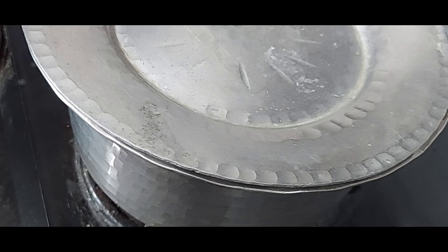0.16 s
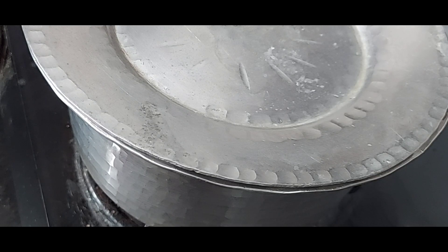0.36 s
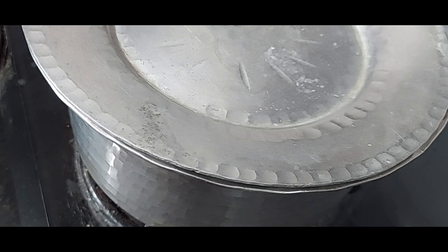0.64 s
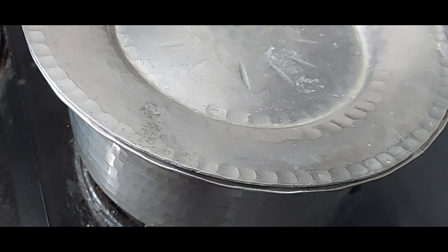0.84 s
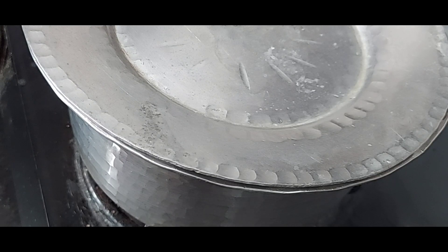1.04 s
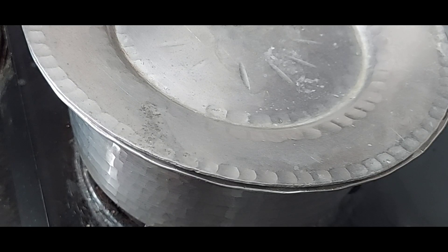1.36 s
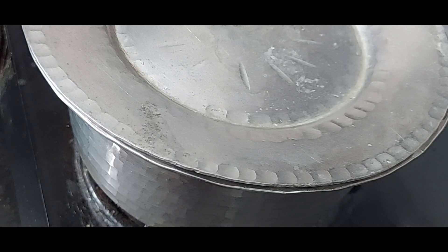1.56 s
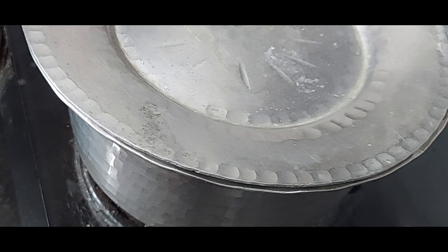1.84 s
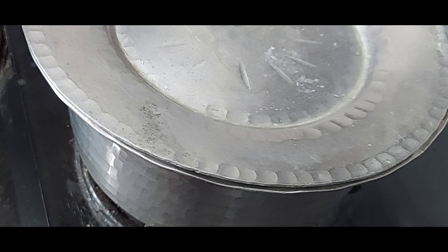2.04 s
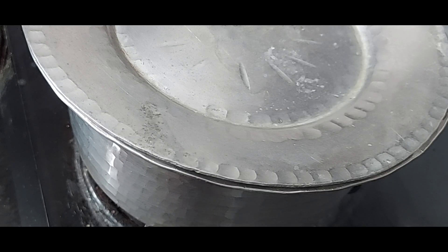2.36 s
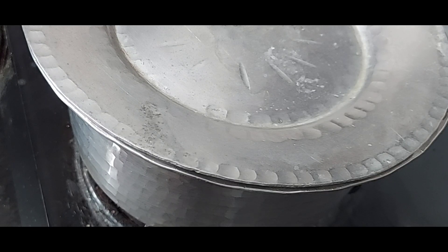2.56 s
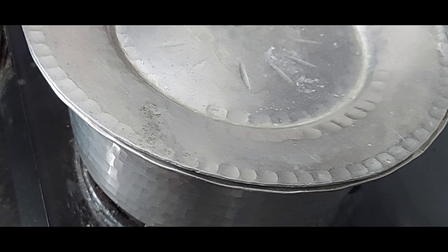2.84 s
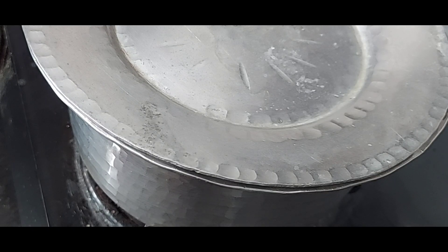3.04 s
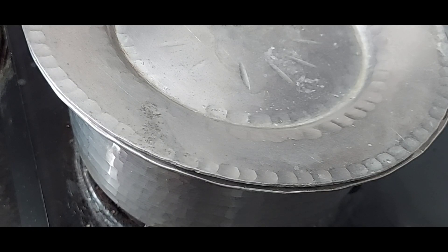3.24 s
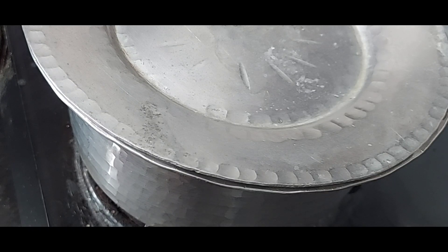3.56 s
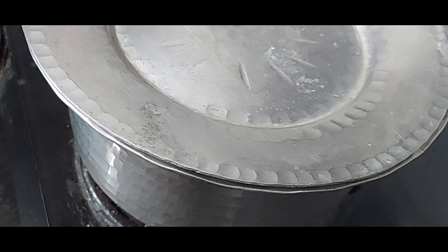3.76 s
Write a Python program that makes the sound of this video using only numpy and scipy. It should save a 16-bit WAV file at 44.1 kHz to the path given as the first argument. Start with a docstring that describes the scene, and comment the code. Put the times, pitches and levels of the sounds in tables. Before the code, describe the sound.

Popcorn pops in a covered steel pot, close and nearly mono. Hollow, low thumps with crisp cracks and small steam puffs come singly at about 0.2, 0.5, 0.8, 1.0, 1.5 and 1.95 seconds, then cluster around 2.2-2.5, 2.9-3.0 and 3.3-3.8. Kernels ping the lid, strongest near 2.5; dull wall knocks start near 1.25. Faint uneven sizzle and low stove rush continue in a small kitchen's short echo.

```python
"""Popcorn pops in a covered steel pot on a kitchen stove, close to a nearly mono microphone.
Each pop is a noise crack, a thump of ringing air under the lid, pot modes, a boom and a steam puff.
Flying kernels ring the lid as damped sines with a noise clack, or knock dully on the pot wall.
Shaped noise sizzles throughout over the stove's low rush; a decaying noise echo is the small kitchen."""
import sys
import numpy as np
from scipy import signal
from scipy.fft import rfft, irfft, next_fast_len
from scipy.io import wavfile
from scipy.ndimage import map_coordinates

SR = 44100
rng = np.random.default_rng(int(sys.argv[2]) if len(sys.argv) > 2 else 0)


def generate_wav(sig):
    """Save sig (samples, or channels by samples) to the path in sys.argv[1] as 16-bit PCM at SR."""
    pcm = np.round(np.clip(np.atleast_2d(sig).T, -1, 1) * 32767).astype(np.int16)
    wavfile.write(sys.argv[1], SR, pcm)


N = 171990
AGE = np.arange(int(0.8 * SR)) / SR  # time since an event's onset, s


def amp(db):
    """Decibels to gain."""
    return 10 ** (np.asarray(db) / 20)


def unit(x):
    """Scale to rms 1."""
    return x / np.sqrt(np.mean(x ** 2) + 1e-20)


def along(points, hz):
    """Interpolate (f/Hz, value) points on a log frequency axis."""
    f, value = np.transpose(points)
    return np.interp(np.log(hz + 1), np.log(f + 1), value)


def fade(t60_s):
    """Exponential decay, -60 dB at t60_s."""
    return amp(-60 * AGE / max(t60_s, 1e-4))


def rise(time_constant_s):
    """Soft exponential onset."""
    return 1 - np.exp(-AGE / max(time_constant_s, 1e-5))


def noise(colour_db, size=len(AGE)):
    """Noise of rms 1; colour_db maps f/Hz to relative level/dB."""
    spectrum = rfft(rng.standard_normal(size))
    gain = amp(colour_db(np.fft.rfftfreq(size, 1 / SR)))
    return unit(irfft(spectrum * gain, size))


def wobble(knots_per_s):
    """Smooth random curve: spline through normal random knots."""
    knots = rng.standard_normal(N // 8)
    return map_coordinates(knots, [np.arange(N) * knots_per_s / SR], mode="wrap")


def ring(modes, scatter_db):
    """Sum of damped modes, each with a random phase and level scatter."""
    total = 0
    for hz, db, t60_s in modes:
        level = amp(db + scatter_db * rng.standard_normal())
        total = total + level * fade(t60_s) * np.sin(2 * np.pi * (hz * AGE + rng.random()))
    return total


def add(track, s, sound):
    """Mix a sound in at time s."""
    part = track[max(round(s * SR), 0):][:len(sound)]
    part += sound[:len(part)]


# Bursting kernels: t/s, thump level/dB, crack level/dB, crack tilt/(dB/octave), steam level/dB
POP_EVENTS = [(0.2273, -1, -5.5, -7, -28.5), (0.5268, -1, -24, -12, -21), (0.8439, -4.5, -9, 3.5, -28.5),
              (1.0368, -1.5, -7, 3.5, -27.5), (1.4501, -5.5, -22.5, -2, -23), (1.9565, -0.5, -11.5, 6, -19),
              (2.1876, 1.5, -11, 9.5, -26), (2.335, -4, -18, 6, -24.5), (2.3429, 0.5, -13.5, 14, -20.5),
              (2.5108, -4, -16, 5, -24.5), (2.902, -13.5, -11, 5, -25), (2.948, -2, -12.5, -7.5, -23),
              (3.0065, 0.5, -12.5, 8, -25), (3.3176, -2.5, -14.5, -3.5, -24), (3.3683, -10, -37, -2, -33),
              (3.4280, -1, -13.5, -11, -24.5), (3.4608, -3, -3.5, 7, -34), (3.4938, -5.5, -14, 2, -30),
              (3.7205, -3.5, -15.5, 8, -30), (3.766, -5.5, -15, 3, -30)]


def pops():
    """A bursting hull cracks, thumps the air, rings the pot, booms in the room and vents steam."""
    boom_db, pot_db = -30, -33
    out = np.zeros(N)
    push = thump()
    for s, thump_db, crack_db, tilt_db_per_octave, steam_db in POP_EVENTS:
        body = push + amp(boom_db) * boom() + amp(pot_db) * pot_ring()
        pop = amp(thump_db) * body
        pop = pop + amp(crack_db) * crack(tilt_db_per_octave)
        pop = pop + amp(steam_db) * steam_puff()
        add(out, s, pop)
    return out


# Air resonances under the lid and around the pot: f/Hz, level/dB, t60/s
AIR_MODES = [(80.7, -40, 0.55), (102.65, -29.5, .7), (145, -17.5, 0.054), (201, -27.5, 0.22),
             (214.6, -24, 0.44), (284.6, -32, 0.48), (323.3, -1.4, 0.037), (330, -18, 0.094),
             (375.3, -36, 0.57), (486.4, -36.5, 0.15), (489, -2.5, 0.016)]
# Thump echoes off nearby walls: delay/s, level/dB
WALL_ECHOES = [(.01164, -10), (.02213, -8.7), (.02514, -11), (.03552, -10.7), (.06503, -15)]


def thump():
    """The swelling kernel gives one push, the enclosed air rings on, nearby walls echo both."""
    push_hz, push_db, push_lag_s = 252.4, -4.5, 0.0029
    push_rise_s, air_rise_s = 0.00034, 0.0058
    t = AGE - push_lag_s
    after = np.maximum(t, 0)
    u = (np.pi * push_hz * t) ** 2
    push = amp(push_db) * (1 - 2 * u) * np.exp(-u) * rise(push_rise_s)  # Ricker pulse
    air = sum(amp(db - 60 * after / t60_s) * np.cos(2 * np.pi * hz * t) for hz, db, t60_s in AIR_MODES)
    direct = push + air * (1 - np.exp(-after / air_rise_s))
    echoes = sum(amp(db) * np.interp(AGE - s, AGE, direct, left=0) for s, db in WALL_ECHOES)
    return direct + echoes


# Hull crack spectrum before tilt: f/Hz, relative level/dB
CRACK_COLOUR = [(300, 3.5), (1000, -52), (2150, -7.5), (2600, 14), (3100, 2.5), (3700, 7.5), (7000, 7.5),
                (9700, 8), (12500, -3.5), (15500, -15)]


def crack(tilt_db_per_octave):
    """The hull tears: a short noise burst, tilted above 1 kHz, with a weaker scattered tail."""
    rise_s, t60_s, scatter_db, scatter_t60_s = 0.0008, 0.011, -15.5, 0.11

    def colour_db(hz):
        octaves = np.log2(np.maximum(hz, 1000) / 1000)
        return along(CRACK_COLOUR, hz) + tilt_db_per_octave * octaves

    decay = fade(t60_s) + amp(scatter_db) * fade(scatter_t60_s)
    return noise(colour_db) * rise(rise_s) * decay


# Pot body modes: f/Hz, relative level/dB, t60/s
POT_MODES = [(826, -6, 0.5), (853, -5.5, 0.39), (1558, -3.5, 0.25), (1590, -4.5, 0.33), (1672, 1, 0.076),
             (2516, -0.5, 0.19), (2539, 6, 0.039), (3575, -9.5, 0.3)]


def pot_ring():
    """The steel body, shaken by a pop, rings in its damped modes."""
    return ring(POT_MODES, scatter_db=3.0) * rise(0.00029)


# Room boom spectrum: f/Hz, relative level/dB
BOOM_COLOUR = [(30, -40), (80, 6.5), (320, -2.5), (700, -24.5), (1300, -92)]


def boom():
    """The room answers a pop with slowly rising, decaying low noise."""
    rise_s, t60_s = 0.022, 0.5
    return noise(lambda hz: along(BOOM_COLOUR, hz)) * rise(rise_s) * fade(t60_s)


# Steam puff spectrum: f/Hz, relative level/dB
STEAM_COLOUR = [(600, 13), (2000, 4), (3500, 5), (7200, -2), (9300, 11), (11500, -8), (14000, -5.5),
                (16000, -68)]


def steam_puff():
    """Steam leaves the burst kernel as a soft-edged puff of noise."""
    rise_s, t60_s = 0.0099, 0.31
    return noise(lambda hz: along(STEAM_COLOUR, hz)) * rise(rise_s) * fade(t60_s)


# Lid strikes: t/s, level/dB, brightest f/Hz, width/octaves, favoured mode 1 f/Hz, mode 2 f/Hz, their t60/s
LID_STRIKES = [(0.3937, -26, 5100, 0.81, 6270, 3897, 0.23), (0.5606, -18.5, 4200, 0.48, 4855, 4313, 0.18),
               (0.571, -22.5, 5000, 0.54, 5585, 3984, 0.37), (0.6624, -26, 8700, 1.06, 9300, 7400, .1),
               (1.4927, -20, 5230, 0.94, 3897, 6400, 0.17), (1.969, -21.5, 7340, 0.79, 7430, 3350, 0.2),
               (1.991, -18.5, 4100, 0.46, 4855, 4040, .34), (2.5185, -10.5, 3700, 1.1, 2510, 5300, 0.12),
               (2.537, -15.5, 3700, .55, 3223, 4370, 0.22), (2.5782, -20.5, 8360, 0.23, 9300, 9450, 0.12),
               (3.040, -28.5, 4970, 0.89, 3350, 5300, 0.26), (3.053, -24.5, 3770, 0.65, 3718, 4320, .16),
               (3.0973, -23.5, 4400, 1.08, 5350, 6300, .18), (3.336, -25.5, 8300, 0.46, 7430, 9600, 0.11),
               (3.37, -30, 1940, 0.13, 1590, 2475, 0.052), (3.8012, -30.5, 5440, 0.55, 3718, 5060, 0.29),
               (3.8422, -24.5, 4560, 0.42, 4855, 5585, 0.29)]
# Main lid modes: f/Hz
LID_MODE_HZ = [1590, 2475, 2515, 2942, 3223, 3350, 3677, 3718, 3897, 3984, 4313, 4855, 5240, 5350, 5585,
               6270]
# Main lid modes, same order: relative level/dB
LID_MODE_DB = [8, 9, 12, 6.5, 0, 8.5, 8, 1, -2, 1, -3, 3.5, 4, -4, -0.5, 5.5]


def lid_modes():
    """Main modes plus 100 crowded upper modes at random frequencies: f/Hz, level/dB, t60/s."""
    main_t60_s = 0.23
    upper_low_hz, upper_high_hz, upper_db, upper_t60_s, upper_count = 3023, 13210, 0, 0.13, 100
    main = [(hz, db, main_t60_s) for hz, db in zip(LID_MODE_HZ, LID_MODE_DB)]
    upper_hz = upper_low_hz + (upper_high_hz - upper_low_hz) * rng.random(upper_count)
    return main + [(hz, upper_db, upper_t60_s) for hz in upper_hz]


def lid_strikes():
    """Contact sets the brightness, the spot hit favours two modes, the ring blooms as it spreads."""
    favoured_boost_db, rise_s, bloom_s = 7, 0.00073, 0.0022
    clack_db, clack_t60_s, wash_db, wash_t60_s = 1.5, 0.015, -10.5, 0.13
    out = np.zeros(N)
    lid = lid_modes()
    for s, strike_db, centre_hz, octaves, first_hz, second_hz, favoured_t60_s in LID_STRIKES:

        def contact_db(hz):
            offset = np.log2((hz + 1) / centre_hz) / octaves
            return -10 * np.log10(1 + offset ** 4)

        favoured = [np.argmin([abs(mode[0] - hz) for mode in lid]) for hz in (first_hz, second_hz)]
        modes = []
        for k, (hz, db, t60_s) in enumerate(lid):
            level_db = db + contact_db(hz)
            if k in favoured:
                level_db, t60_s = level_db + favoured_boost_db, favoured_t60_s
            modes.append((hz, level_db, t60_s))
        strength = np.sqrt(sum(amp(db) ** 2 for _, db, _ in modes) / 2)  # nominal initial rms
        tone = ring(modes, scatter_db=0.5) * rise(bloom_s) / strength
        clack_decay = amp(clack_db) * fade(clack_t60_s) + amp(wash_db) * fade(wash_t60_s)
        clack = noise(contact_db) * clack_decay
        add(out, s, amp(strike_db) * rise(rise_s) * (tone + clack))
    return out


# Dull pot wall knocks: t/s, level/dB
WALL_KNOCKS = [(1.2435, -21.5), (1.287, -29), (2.36, -27.5), (2.9481, -25), (3.369, -36)]
# Knock noise spectrum: f/Hz, relative level/dB
KNOCK_COLOUR = [(100, 1), (550, 1.5), (1100, -7.5), (2500, -14.5), (14000, -29)]


def wall_knocks():
    """A soft popped kernel scrapes the pot side, waking and damping its low modes."""
    grain_db, grain_knots_per_s, bump_t60_s = 2.5, 274, 0.17
    soft_hz, ring_db, damp_t60_s, rise_s = 960, -6, 0.94, 0.0015
    out = np.zeros(N)
    # soft contact weakens modes above soft_hz
    modes = [(hz, db - 10 * np.log10(1 + (hz / soft_hz) ** 6), t60_s) for hz, db, t60_s in POT_MODES]
    for s, knock_db in WALL_KNOCKS:
        grain = unit(amp(grain_db * wobble(grain_knots_per_s)[:len(AGE)]))
        bump = noise(lambda hz: along(KNOCK_COLOUR, hz)) * grain * fade(bump_t60_s)
        tone = amp(ring_db) * ring(modes, scatter_db=2.0) * fade(damp_t60_s)
        add(out, s, amp(knock_db) * rise(rise_s) * (bump + tone))
    return out


# Escaping steam, before offset_db: t/s, level/dB
HISS_LEVEL = [(0, -35), (.12, -31), (.25, -36.5), (.8, -40.5), (1.2, -36), (1.42, -43), (1.6, -36.5),
              (1.92, -51), (2.3, -42), (2.42, -33), (2.68, -33.5), (2.76, -34), (2.88, -39.5),
              (3.15, -37.5), (3.3, -39.5), (3.9, -39)]
# Sizzle spectrum: f/Hz, relative level/dB
SIZZLE_COLOUR = [(1000, -0.5), (2100, -7.5), (2500, -0.5), (4500, -3), (6000, 4.5), (7600, 4), (9300, 11.5),
                 (11500, 1.5), (14000, 0), (16000, -20)]


def sizzle():
    """Steam and hot oil hiss: noise with a drawn level, slow flutter and fine grain."""
    offset_db, flutter_db, grain_db = -4, 1.0, 2.0
    s, db = np.transpose(HISS_LEVEL)
    level_db = np.interp(np.arange(N) / SR, s, db) + offset_db
    level_db = level_db + flutter_db * wobble(40) + grain_db * wobble(900)
    return amp(level_db) * noise(lambda hz: along(SIZZLE_COLOUR, hz), size=N)


# Stove and room rush spectrum: f/Hz, relative level/dB
STOVE_COLOUR = [(20, 3), (45, 3), (100, 8.5), (150, -0.5), (330, 1.5), (560, -7), (850, -8.5), (2000, -18),
                (5000, -25), (15000, -64)]


def stove():
    """Steady low rush of the stove and the room."""
    level_db = -43
    return amp(level_db) * noise(lambda hz: along(STOVE_COLOUR, hz), size=N)


# Kitchen decay: f/Hz, t60/s
KITCHEN_T60 = [(200, 0.54), (2000, 0.41), (6000, 0.35), (14000, 0.36)]


def kitchen(x, low_hz):
    """Diffuse small-room echo: noise decaying per frequency, high-passed at low_hz, 5 ms late."""
    hz, t, z = signal.stft(rng.standard_normal(len(AGE)), SR, nperseg=256)
    decay = amp(-60 * t / along(KITCHEN_T60, hz)[:, None])
    tail = signal.istft(z * decay, SR, nperseg=256)[1]
    tail = signal.sosfilt(signal.butter(1, low_hz, "high", fs=SR, output="sos"), tail)
    delayed = np.pad(tail, (SR // 200, 0))
    return signal.fftconvolve(x, delayed / np.linalg.norm(tail))[:N]


def scene():
    """Pot in the middle, nearly mono; left and right differ only very faintly, mostly low down."""
    echo_db, side_echo_db, side_rush_db = -6, -63.5, -29.5
    pot = pops() + lid_strikes() + wall_knocks() + sizzle()
    mid = pot + amp(echo_db) * kitchen(pot, low_hz=544) + stove()
    side = amp(side_echo_db) * kitchen(pot, low_hz=60) + amp(side_rush_db) * stove()
    return np.array([mid + side, mid - side])


def record(dry):
    """The microphone loses the deep bass and keeps nothing above its band limit."""
    low_hz, top_hz = 45, 16100
    m = next_fast_len(N + SR // 2)
    hz = np.fft.rfftfreq(m, 1 / SR)
    response = hz ** 2 / (hz ** 2 + low_hz ** 2) * (hz < top_hz)
    return irfft(rfft(dry, m) * response, m)[:, :N]


dry = scene()
out = record(dry)
generate_wav(out)
```